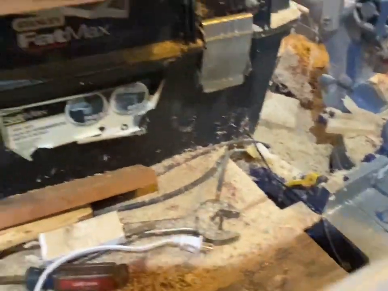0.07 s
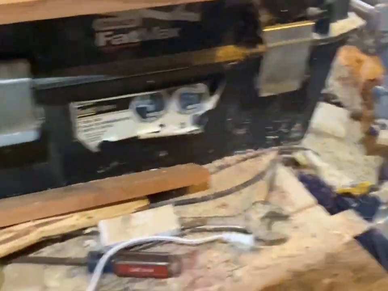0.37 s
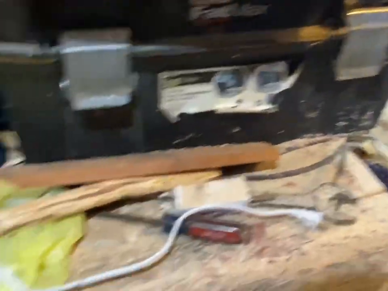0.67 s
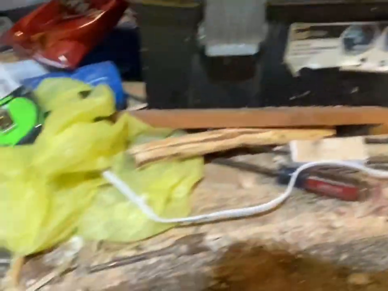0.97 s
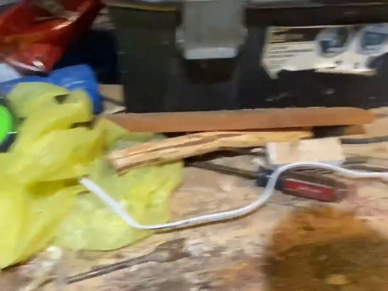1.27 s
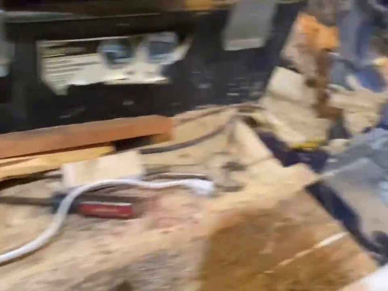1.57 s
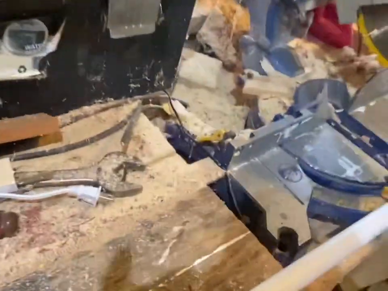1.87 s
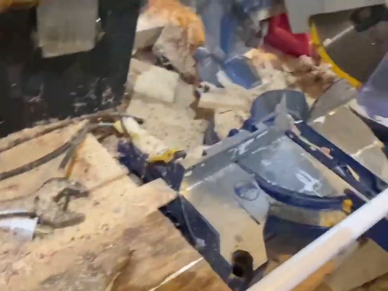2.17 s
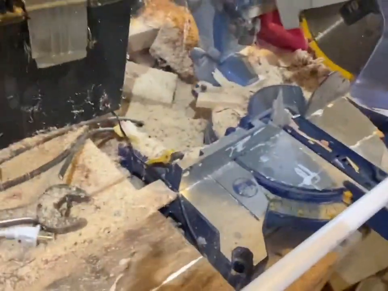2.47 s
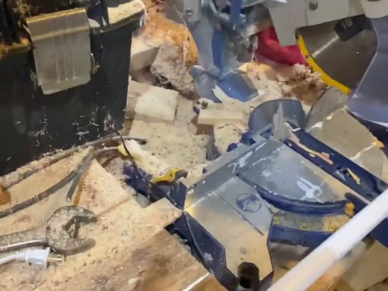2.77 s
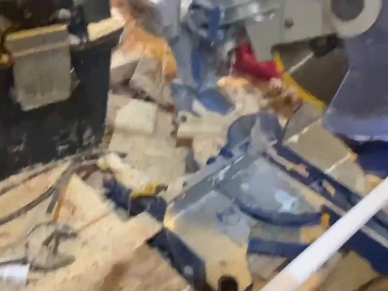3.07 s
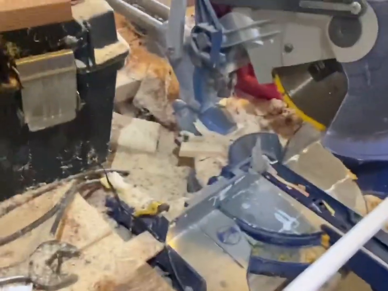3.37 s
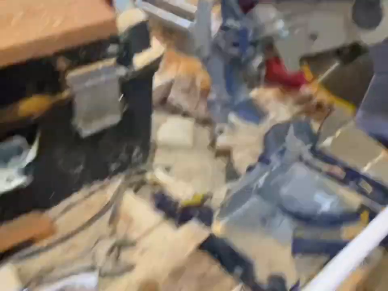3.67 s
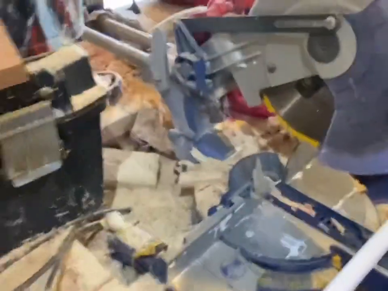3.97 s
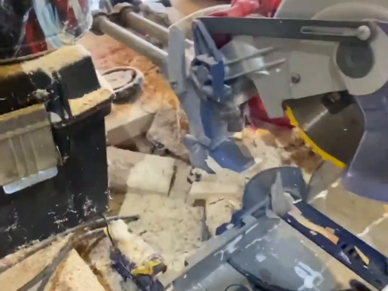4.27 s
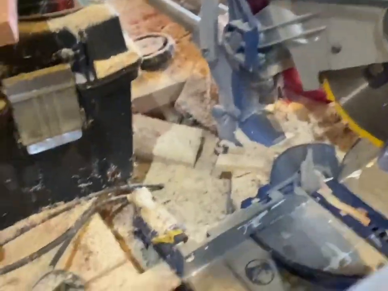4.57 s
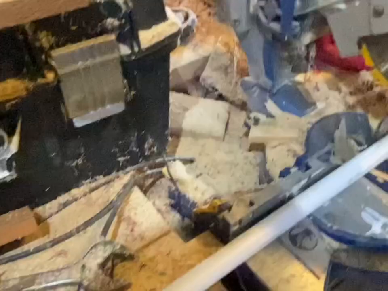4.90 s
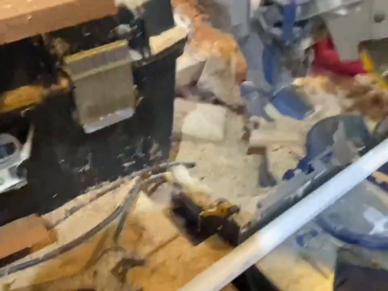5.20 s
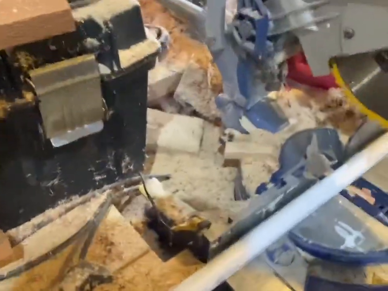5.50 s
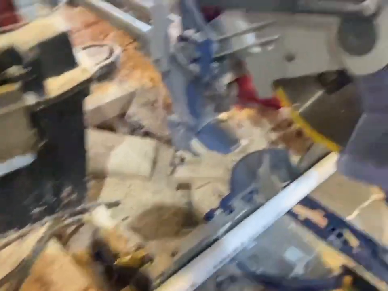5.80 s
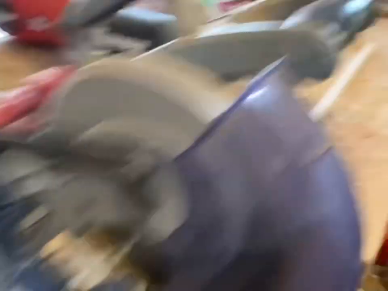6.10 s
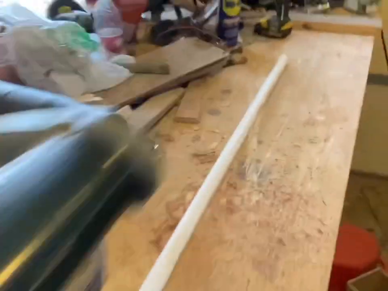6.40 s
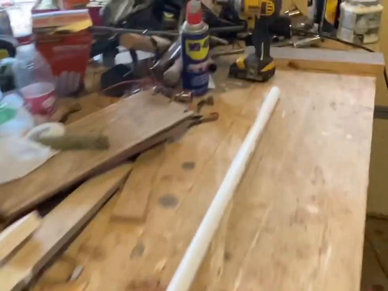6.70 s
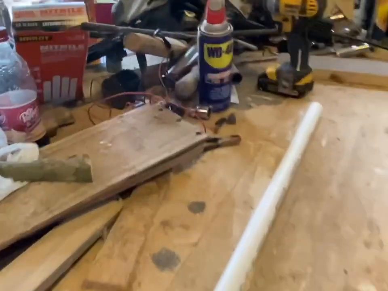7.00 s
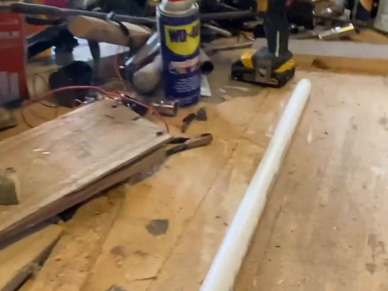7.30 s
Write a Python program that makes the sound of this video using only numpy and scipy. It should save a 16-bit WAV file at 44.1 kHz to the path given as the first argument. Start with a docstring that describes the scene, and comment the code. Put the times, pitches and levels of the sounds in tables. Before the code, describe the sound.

A small, hard-walled workshop is quiet, with a faint low rumble. At about 0.3 seconds one plastic pipe clicks against another. At 1.4 seconds a stack of pipes topples slightly to the left with a loud, bright, hollow clatter. A second, longer rush follows from about 1.8 seconds, peaking just after 2 with a low boom and a short room echo. The rebounds die away with a brief scrape by 3 seconds. A faint sleeve swish and a light tap follow. From about 4.3 seconds one pipe is handled close to the microphone. It knocks sharply on a saw table at 4.8 seconds, well below the crash in level, and bumps again around 5. It is then nudged along with faint scraping, rustling sleeves and shuffling shoes. Softer knocks come near 5.7, 6.3 and 7.1 seconds, and the sliding continues until about 7.5.

```python
"""A stack of plastic pipes topples in two rushes, off to the left in a small, hard-walled workshop.
Each impact excites the pipes' damped normal modes; the rebounds die away under a hollow boom.
Beforehand one pipe clicks against another; afterwards one is knocked onto a saw table close by and
nudged along by stick-slip friction. Sleeves rustle and shoes shuffle as friction noise, over quiet air
and a low rumble, and the walls return the impacts as a diffuse reverberant field."""
import sys
import numpy as np
from scipy import signal
from scipy.fft import rfft, irfft
from scipy.io import wavfile
from scipy.ndimage import uniform_filter1d

SR = 44100
rng = np.random.default_rng(int(sys.argv[2]) if len(sys.argv) > 2 else 0)


def digitize_waveform(pressure):
    """Quantize a signal to 16-bit integers and store it at the path in sys.argv[1].

    Rows of a 2-D input are taken as channels; values are limited to [-1, 1].
    """
    field = np.atleast_2d(pressure).T
    bounded = np.clip(field, -1, 1)
    quanta = np.round(bounded * 32767).astype(np.int16)
    wavfile.write(sys.argv[1], SR, quanta)


N = 328545
TIME = np.arange(N) / SR
CUTOFF_HZ = 15900

# Levels in all tables are relative; pan is left over right, brightness is treble over middle.
# left-right coherence of the diffuse field: f/Hz, coherence (0-1)
COHERENCE = [(60, 0.94), (170, 0.83), (350, 0.61), (700, 0.088), (1300, 0.065), (3000, 0.002),
             (15000, 0.12)]
# friction while the pipe is moved, one list for each move: t/s, sliding level/dB, rustle level/dB
MOVES = [
    [(4.27, -66.5, -71), (4.346, -55.5, -65), (4.438, -63, -63.5), (4.82, -50, -61.5), (4.988, -50, -51),
     (5.19, -54.5, -57.5), (5.46, -60.5, -64.5)],
    [(5.52, -62, -63), (5.624, -53.5, -57), (5.738, -55.5, -46.5), (5.826, -53, -50.5),
     (5.982, -57.5, -53.5), (6.11, -56.5, -70)],
    [(6.17, -61, -62.5), (6.234, -46.5, -55), (6.388, -56, -49.5), (6.526, -49.5, -52.5),
     (6.68, -55.5, -54), (6.798, -62.5, -67), (6.94, -64, -67.5)],
    [(7.01, -62, -69.5), (7.114, -54.5, -58), (7.242, -57.5, -52), (7.372, -50.5, -47.5), (7.45, -50, -49)],
]


def from_db(db):
    """Amplitude ratio of a level: a factor of ten for every 20 dB."""
    return 10 ** (np.asarray(db) / 20)


def rms_one(x):
    """Normalisation to unit mean power."""
    return x / np.sqrt(np.mean(x ** 2) + 1e-20)


def energy_one(x):
    """Normalisation to unit energy per channel."""
    return rms_one(x) / np.sqrt(x.shape[-1])


def running_rms(x, size):
    """Envelope as the rms over a sliding window of samples."""
    return np.sqrt(np.abs(uniform_filter1d(x ** 2, size)) + 1e-16)


def at_hz(points, hz):
    """Interpolation on a logarithmic frequency axis."""
    f, value = np.transpose(points)
    return np.interp(np.log(hz), np.log(f), value)


def gains(rows):
    """Envelopes interpolated in decibels, one for each level column, silent outside their span."""
    times, *columns = np.transpose(rows)
    return from_db([np.interp(TIME, times, db, left=-200, right=-200) for db in columns])


def add(track, s, sound):
    """Superposition of a sound on a track, starting at time s."""
    start = max(round(s * SR), 0)
    track[..., start:start + sound.shape[-1]] += sound[..., :N - start]


def decay(t, t60):
    """Exponential damping: 60 dB down after t60."""
    return from_db(-60 * t / t60)


def swell(s, attack_s, hold_s, release_s, power):
    """Power-law envelope: a linear rise, a hold, then a fall as a power of the time left."""
    rise = np.clip((TIME - s) / attack_s, 0, 1)
    left = np.clip(1 - (TIME - s - attack_s - hold_s) / release_s, 0, 1)
    return rise * left ** power


def wander(per_s):
    """Slow random modulation with a spread of about 1."""
    knots = rng.standard_normal(400)
    return 1.2 * np.interp(TIME * per_s, np.arange(len(knots)), knots)


def filtered(x, hz, kind, order=2):
    """Frequency selection with a maximally flat passband."""
    return signal.sosfilt(signal.butter(order, hz, kind, fs=SR, output="sos"), x)


def resonator(x, hz, q):
    """Forced response of one resonance of quality factor q."""
    return signal.lfilter(*signal.iirpeak(hz, q, fs=SR), x)


def registers(x, bass_hz=350, treble_hz=3500):
    """Crossover into middle, bass and treble, in that order."""
    cuts = [([bass_hz, treble_hz], "band"), (bass_hz, "low"), (treble_hz, "high")]
    return [filtered(x, hz, kind, order=3) for hz, kind in cuts]


def coloured(x, spectrum):
    """Minimum-phase filtering: folding the cepstrum of a spectrum makes its response causal."""
    size = len(x)
    hz = np.arange(size // 2 + 1) * SR / size + 1
    cepstrum = irfft(np.log(from_db(at_hz(spectrum, hz))))
    cepstrum[1:size // 2] *= 2
    cepstrum[size // 2 + 1:] = 0
    return irfft(rfft(x) * np.exp(rfft(cepstrum)))


def placed(x, pan_db, lag_ms=0):
    """Level and time differences: a source on the left is louder and earlier on that side."""
    t = TIME[:len(x)]
    delayed = np.interp(t - lag_ms / 1000, t, x)
    return np.array([x * from_db(pan_db / 2), delayed * from_db(-pan_db / 2)])


def diffuse(mid, side, hz):
    """Spatial coherence: long waves reach both sides alike, short ones independently."""
    alike = at_hz(COHERENCE, hz)
    return np.sqrt(1 + alike) * mid + np.sqrt(1 - alike) * side * [[1], [-1]]


def noise(spectrum, size=N, t60s=None):
    """Diffuse noise field in bands; given decay times, each band is damped at its own rate."""
    edges_hz = np.geomspace(35, 17000, 23)
    out, white = 0, rng.standard_normal((2, 2, size))
    for k, (low, high) in enumerate(zip(edges_hz, edges_hz[1:])):
        hz = np.sqrt(low * high)
        fade = 1 if t60s is None else decay(TIME[:size], at_hz(t60s, hz)) + 1e-12
        mid, side = filtered(white[k % 2] * fade, [low, high], "band")
        out = out + from_db(at_hz(spectrum, hz)) * diffuse(mid, side, hz)
    return rms_one(out)


def contacts(per_s, spread_db):
    """Shot noise: independent small impacts of uneven size."""
    sizes = from_db(spread_db * np.minimum(rng.exponential(1, N), 3)) * rng.choice([-1, 1], N)
    return rms_one(sizes * (rng.random(N) < per_s / SR))


def uneven(slips, steady, size):
    """Amplitude modulation of friction: a steady part plus a flutter that follows the slips."""
    return rms_one(steady + rms_one(running_rms(slips, size)))


def body(spectrum, modes, dense_t60, ring_db, snap_db, size=8192):
    """Impulse response by modal superposition: a snap, a crack of crowded modes and clear ringing."""
    t = TIME[:size]
    hz, level_db, t60 = np.transpose(modes)[:, :, None]
    strength = from_db(level_db + rng.normal(0, 1.5, hz.shape)) * rng.choice([-1, 1], hz.shape)
    rings = np.sum(strength * np.sin(2 * np.pi * hz * t) * decay(t, t60), axis=0)
    crack = energy_one(rng.standard_normal(size) * decay(t, dense_t60))
    crack[0] += from_db(snap_db)
    return energy_one(coloured(crack, spectrum)) + from_db(ring_db) * energy_one(rings)


def blow(response, levels_db, soft_hz):
    """Contact hardness sets bandwidth: a blow with little treble is duller in the middle too."""
    middle, bass, treble = registers(response)
    brightness_db = levels_db[2] - levels_db[0]
    top_hz = np.clip(soft_hz * from_db(brightness_db + 26), soft_hz, SR / 4)
    middle = filtered(middle, top_hz, "low", order=3)
    return sum(from_db(db) * part / running_rms(part, size=256).max()
               for db, part in zip(levels_db, (middle, bass, treble)))


def workshop(x, build_s):
    """Reverberation: diffuse reflections build up within milliseconds and decay exponentially."""
    # reverberation time: f/Hz, t60/s
    decay_times = [(100, 0.4), (400, 0.4), (2000, 0.5), (6000, 0.52), (15000, 0.35)]
    # spectrum of the reflections: f/Hz, level/dB
    colour = [(60, 0.5), (200, 5), (600, 1), (2000, 0.5), (6000, 2), (15000, 6.5)]
    tail = noise(colour, size=32768, t60s=decay_times)
    build_up = 1 - np.exp(-TIME[:tail.shape[1]] / build_s)
    return signal.fftconvolve(x[None], energy_one(tail * build_up), axes=1)[:, :N]


def air():
    """Stationary broadband noise: the still air of the room."""
    # spectral density: f/Hz, level/dB
    spectrum = [(21, -37), (35, -15), (129, -18.5), (258, -15.5), (351, -13.5), (478, -20.5), (720, -17),
                (1020, -18.5), (1370, -11), (1700, -12.5), (4000, -15), (5590, -17), (7810, -27.5),
                (16000, -43.5)]
    return from_db(-68.5) * noise(spectrum)


def rumble():
    """Amplitude-modulated low noise: a rumble that swells and sinks."""
    # envelope: t/s, level/dB
    envelope = [(0, -57), (.6, -59.5), (1.3, -59.5), (2.9, -54), (3.3, -58.5), (3.61, -52), (3.65, -67.5),
                (4.25, -70), (4.6, -68.5), (7.45, -58)]
    # spectral density: f/Hz, level/dB
    spectrum = [(21, -30), (35, -12), (55, -6.5), (95, -10.5), (155, -15.5), (227, -20), (309, -25.5),
                (420, -15.5), (587, -27.5)]
    return gains(envelope)[0] * filtered(noise(spectrum), 900, "low")


def sleeve_swishes(width_s=0.086):
    """Sliding friction of cloth on cloth: a smooth hiss swells and fades in one broad resonance."""
    # swishes: crest t/s, level/dB, centre f/Hz
    swishes = [(1.09, -62, 4620), (3.095, -54, 5560)]
    out = 0
    for s, db, hz in swishes:
        hiss = resonator(rng.standard_normal((2, N)), hz, q=2.7)
        out = out + from_db(db) * rms_one(hiss) * np.exp(-((TIME - s) / width_s) ** 2)
    return out


def brushes(attack_s=0.035, release_s=0.1):
    """Friction of fingers and cloth close by: a thin, high hiss, grainy with catching fibres."""
    # strokes: t/s, duration/s, level/dB
    strokes = [(1.028, 0.15, -63.5), (3.005, 0.26, -74), (4.264, 0.38, -65.5), (4.56, 0.32, -57),
               (4.838, 0.38, -57.5), (5.3, 0.2, -61), (5.38, 0.13, -62), (5.515, 0.11, -53),
               (5.604, 0.42, -51.5), (6.007, 0.14, -56), (6.155, 0.56, -56), (7.185, .4, -58)]
    # spectral density of the hiss: f/Hz, level/dB
    spectrum = [(35, -60), (6000, -17), (8500, 3.5), (10300, 12), (12000, 6.5), (14500, 12.5), (16000, -4)]
    pressure = sum(from_db(db) * swell(s, attack_s, length - attack_s - release_s, release_s, power=1)
                   for s, length, db in strokes)
    grain = uneven(contacts(per_s=250, spread_db=-10), steady=2.6, size=128)
    return pressure * grain * noise(spectrum)


def grit(catches_per_s=42, count=3):
    """Shot noise of sliding: the pipe catches on specks of sawdust, each with a tiny dry crack."""
    # spectral density of a catch: f/Hz, level/dB
    spectrum = [(200, -28), (1000, -2), (2200, -3), (5000, 0), (15000, -27)]
    t, crackle = TIME[:2048], 0
    for _ in range(count):
        crack = coloured(rng.standard_normal(len(t)) * decay(t, t60=0.026), spectrum)
        catches = contacts(catches_per_s / count, spread_db=6.5)
        crackle = crackle + signal.oaconvolve(catches, crack)[:N]
    sliding, rustle = gains(np.vstack(MOVES))
    direct = from_db(-10) * np.sqrt(sliding * rustle) * rms_one(crackle)
    return direct + from_db(3.5) * workshop(direct, build_s=0.00093)


def grip_glide(x, depth=0.007):
    """Frequency modulation: as the grip shifts, the pitch of a resonance wanders."""
    position = np.cumsum(1 + depth * wander(per_s=5)) % (N - 1)
    whole, part = position.astype(int), position % 1
    return np.take(x, whole, axis=-1) * (1 - part) + np.take(x, whole + 1, axis=-1) * part


def hollows():
    """Friction-driven resonances swell and fade as grip and contact shift, the low ones most."""
    # rubbed resonances: f/Hz, bandwidth/Hz, level/dB
    resonances = [(170, 45, -5), (354, 60, -10), (534, 24, -14.5), (766, 170, -9.5), (1364, 42, -18),
                  (2014, 75, -14.5), (2440, 50, -21), (2804, 60, -15), (3416, 46, -15), (4280, 90, -15),
                  (5000, 140, -17), (5480, 130, -13), (6340, 140, -18)]
    # depth of their fluctuation: f/Hz, spread/dB
    swing = [(500, 5.2), (2000, 3.6), (5000, 2.6)]
    out = 0
    for hz, width_hz, db in resonances:
        mid, side = resonator(rng.standard_normal((2, N)), hz, q=hz / width_hz)
        swing_db = at_hz(swing, hz) * wander(per_s=12)
        out = out + from_db(db) * rms_one(diffuse(mid, side, hz) * from_db(swing_db))
    return rms_one(grip_glide(out))


def held_pipe_response(ring_db, snap_db):
    """Frequency-dependent damping: the plastic of the held pipe stills its high modes sooner."""
    # modes of the pipe on the table: f/Hz, level/dB
    partials = [(205, -19), (345, -9), (470, -3), (572, 2), (684, 6), (860, 6.5), (1014, 7.5), (1087, 6.5),
                (1200, 3.5), (1370, 5.5), (1720, 5.5), (2040, 3.5), (2370, 8.5), (5001, 1), (6130, -22),
                (7262, 1)]
    # spectral density of its crack: f/Hz, level/dB
    spectrum = [(40, -44.5), (100, -9), (200, -6), (300, -2), (650, 0.5), (1000, 1.5), (1500, -6.5),
                (2400, -7), (3300, -15.5), (6000, -11), (8000, -39), (10500, -19.5), (12500, -56),
                (15000, -36.5)]
    modes = [(hz, db, 0.1 * (1000 / hz) ** 0.75) for hz, db in partials]
    return body(spectrum, modes, dense_t60=0.035, ring_db=ring_db, snap_db=snap_db)


def handling():
    """Friction of pipe, shoes and sleeves: tiny slips roughen the rubbing and set the pipe ringing."""
    # spectral density of the rubbing: f/Hz, level/dB
    spectrum = [(35, -45), (70, 13), (160, 2), (250, 12.5), (350, -4), (500, -33), (700, -9.5), (1500, -4),
                (2600, -6), (5400, -6.5), (8500, -16.5), (10300, -46), (16000, -18)]
    slips = contacts(per_s=380, spread_db=3)
    rub = (noise(spectrum) + hollows()) * uneven(slips, steady=4.9, size=330)
    sliding, rustle = gains(np.vstack(MOVES))
    # the pipe slides in the middle register, shoes shuffle in the bass, sleeves rustle in the treble
    drive = from_db(1.5) * sliding, from_db(-2) * sliding, from_db(-0.5) * rustle
    friction = sum(gain * rms_one(part) for gain, part in zip(drive, registers(rub)))
    ringing = signal.oaconvolve(slips, held_pipe_response(ring_db=2.5, snap_db=27))[:N]
    return friction + from_db(-9) * sliding * rms_one(grip_glide(ringing))


def scrapes(slips_per_s=1500):
    """Stick-slip friction: dense tiny contacts in a broad resonance, starting fast and easing off."""
    # drags of a pipe over wood or another pipe: t/s, duration/s, level/dB, centre f/Hz
    drags = [(0.005, 0.23, -67, 2190), (1.099, 0.072, -70, 1340), (2.431, 0.18, -51.5, 4670),
             (2.519, 0.12, -39.5, 1390), (2.689, 0.12, -50, 1200), (2.694, 0.1, -64, 5052),
             (2.912, 0.16, -61, 780), (4.568, 0.066, -51.5, 1940), (4.712, 0.028, -60.5, 4250),
             (5.386, 0.048, -56.5, 2580), (5.529, 0.032, -55.5, 2520), (5.566, 0.015, -56, 1690),
             (5.605, 0.025, -58, 2040), (5.682, 0.021, -49.5, 1830), (5.714, 0.019, -60, 2390),
             (5.843, 0.2, -62.5, 2380), (6.075, 0.035, -63.5, 1590), (6.296, 0.093, -55.5, 710),
             (6.713, 0.031, -56, 568), (6.78, 0.11, -62.5, 1570), (7.062, 0.044, -50.5, 660),
             (7.239, 0.17, -55, 553)]
    out = np.zeros(N)
    for s, length, db, hz in drags:
        progress = np.linspace(0, 1, round(length * SR))[:8192]
        slips = rng.standard_normal(8192) * (rng.random(8192) < slips_per_s / SR)
        drag = filtered(slips[:len(progress)], [hz / 1.45, hz * 1.45], "band")
        pressure = np.sin(np.pi * progress ** 0.51)
        add(out, s, from_db(db) * rms_one(drag * pressure))
    return out + from_db(5) * workshop(out, build_s=0.00056)


def thuds(attack_s=0.0028):
    """Soft, heavy contacts excite the low modes of floor and bench; one, set by the spot, rings on."""
    # footfalls and bumps: t/s, level/dB, ring f/Hz, ring level/dB
    bumps = [(0.01, -46.5, 163, -53), (4.282, -59, 143, -49.5), (4.584, -44.5, 169.6, -42),
             (4.614, -48, 309, -44.5), (4.827, -40, 205.6, -32), (4.916, -41, 308, -47),
             (5.036, -33, 382.4, -43.5), (5.102, -38.5, 153, -49), (5.631, -67, 168, -50),
             (5.746, -45, 315, -47), (5.898, -46.5, 299, -47.5), (6.413, -46.5, 337.5, -47),
             (6.723, -52.5, 516, -55.5), (7.094, -47.5, 257, -48), (7.334, -62, 199, -47)]
    # spectral density of a bump: f/Hz, level/dB
    spectrum = [(50, 1), (100, 8), (160, 13.5), (330, 2), (600, 0.5), (2000, -23.5)]
    out, t = np.zeros((2, N)), TIME[:12000]
    for s, db, hz, ring_db in bumps:
        thud = noise(spectrum, size=len(t), t60s=[(100, 0.3), (600, 0.43)])
        ring = np.sin(2 * np.pi * hz * t) * (1 - np.exp(-t / attack_s)) * decay(t, t60=0.24)
        add(out, s, from_db(db) * thud / running_rms(thud[0], size=512).max())
        add(out, s, from_db(ring_db) * ring / running_rms(ring, size=512).max())
    return out


def knocks():
    """Impact excitation: the held pipe meets saw table and bench, so close that direct sound leads."""
    # knocks: t/s, level/dB, bass level/dB, brightness/dB, pan/dB
    strikes = [(0.007, -50, -49, -24, -10), (3.544, -50, -57, -14, 3), (3.778, -60.5, -60.5, -9, 0),
               (4.357, -58, -55, -2, 2), (4.569, -44, -61, -18, -8), (4.62, -51, -63, 3, 6),
               (4.76, -50, -58, -18, -4), (4.803, -19, -40, -9, -11.5), (4.81, -23, -28, -22, 2),
               (4.915, -36, -52, -30, 6), (4.948, -47, -50, -29, 0), (5.005, -33, -33, -20, -6),
               (5.027, -38, -48, -7, 26), (5.032, -32, -44, -8, -13), (5.051, -40, -44, -4, 15),
               (5.607, -50.5, -66, -24, -5), (5.747, -32, -35.5, -21, -5), (5.818, -50, -58, 4.5, 0),
               (5.921, -52, -56, -14, -5), (6.185, -53.5, -57, 0.5, 15), (6.238, -33.5, -36.5, -23, -3),
               (6.292, -38.5, -58, -29, -4), (6.331, -38.5, -38.5, -28, -2), (7.066, -41, -47.5, -22, 7),
               (7.178, -56, -48, -7, -1)]
    out = np.zeros((2, N))
    for s, db, bass_db, bright_db, pan_db in strikes:
        response = held_pipe_response(ring_db=0.5, snap_db=-6)
        knock = blow(response, (db, bass_db, db + bright_db), soft_hz=970)
        add(out, s, placed(knock, pan_db))
    return out + from_db(-6.5) * workshop(out.mean(axis=0), build_s=0.00061)


def clicks():
    """Free vibration after a light touch of pipe on pipe: a bright, quickly damped ring to the left."""
    # touches: t/s, middle level/dB, bass level/dB, treble level/dB, pan/dB
    touches = [(0.242, -59, -75, -68, -1), (0.299, -27, -38, -33, 5.5), (0.3024, -36.5, -45, -51, 0)]
    # modes of a click: f/Hz, level/dB, t60/s
    modes = [(244.7, -19.5, 0.28), (1290, -12, .04), (1970, 6, 0.015), (2250, -2, 0.009), (2660, -8, 0.021),
             (3580, -1.5, 0.017), (4670, -9, 0.013), (6130, -11, 0.016), (9900, -14.5, 0.016)]
    # spectral density of its crack: f/Hz, level/dB
    spectrum = [(50, -10), (110, 5), (250, 0.5), (500, -7), (1000, -2.5), (2000, -6.5), (2900, -10.5),
                (4500, -19), (9500, -28), (12000, -40), (15000, -34)]
    direct, radiated = np.zeros((2, N)), np.zeros(N)
    for s, *levels_db, pan_db in touches:
        response = body(spectrum, modes, dense_t60=0.17, ring_db=4.5, snap_db=-6)
        add(direct, s, placed(blow(response, levels_db, soft_hz=3000), pan_db, lag_ms=0.432))
        into_room = body(spectrum, modes, dense_t60=0.04, ring_db=-14, snap_db=7)
        add(radiated, s, from_db(levels_db[0]) * into_room)
    return from_db(5) * direct + from_db(24) * workshop(radiated, build_s=0.0015)


def rim_ticks():
    """Brief contact means high frequencies: the hard, cut rim of a pipe strikes with a bright tick."""
    # rim strikes: t/s, level/dB, centre f/Hz, pan/dB
    strikes = [(1.4037, -22.5, 9380, -4.5), (1.4374, -7, 9920, -5.5), (1.4796, -10.5, 7400, 4.5),
               (1.7556, -37, 7580, 1.5), (1.845, -26.5, 7490, 5.5), (1.8582, -21.5, 8270, 5.5),
               (1.901, -25.5, 7710, -1.5), (1.92, -20.5, 7900, 4.5), (2.0174, -11, 7620, 0),
               (2.0802, -7.5, 9490, 5.5), (2.0855, -5.5, 10200, -4), (2.2413, -11, 14040, 4),
               (2.2494, -8, 9800, 0.5), (4.8064, -24, 7750, 12), (6.1856, -34, 9740, 6)]
    out, t = np.zeros((2, N)), TIME[:2048]
    for s, db, hz, pan_db in strikes:
        burst = rng.standard_normal(len(t)) * decay(t, t60=0.0074)
        tick = filtered(burst, [hz / 1.35, min(hz * 1.5, CUTOFF_HZ)], "band")
        add(out, s, placed(from_db(db - 3.5) * tick / np.abs(tick).max(), pan_db))
    return out + from_db(-7) * workshop(out.mean(axis=0), build_s=0.003)


def boom(hz=147, width_hz=8):
    """Forced resonance: as the bulk of the stack lands, it keeps one low, hollow mode going."""
    ring = resonator(rng.standard_normal(N), hz, q=hz / width_hz)
    drive = from_db(-28) * swell(2.108, attack_s=0.054, hold_s=0.14, release_s=0.36, power=2.3)
    return placed(drive * ring / running_rms(ring, size=2048), pan_db=-3.5)


def ringing_pipes(count=3, pitch_spread=0.006):
    """Beating: a struck pipe rings with a cluster of close modes."""
    # pipes that ring out above the rest: t/s, f/Hz, level/dB, t60/s
    rings = [(1.403, 205, -32, 0.12), (1.4405, 1890, -16, 0.016), (1.4405, 2260, -14.5, 0.025),
             (1.44, 2570, -18.5, .05), (1.46, 261, -34.5, 0.32), (1.47, 2605, -28.5, 0.16),
             (1.474, 408, -31, 0.4), (1.49, 549, -29.5, 0.16), (1.442, 1700, -28.5, .25),
             (1.853, 960, -30, 0.16), (1.903, 236, -27, 0.05), (1.911, 350, -31, 0.27),
             (1.921, 3410, -21.5, 0.015), (1.93, 1254, -32, 0.46), (2.022, 2089, -23, 0.44),
             (2.051, 2332, -23.5, 0.19), (2.08, 2734, -29, 0.4), (2.088, 3096, -30.5, 0.3),
             (2.08, 4600, -35, .5), (2.088, 7118, -33, .4), (2.088, 9991, -31, .45),
             (2.152, 1385, -19.5, 0.21), (2.162, 1710, -32, 0.19), (2.185, 1220, -24, 0.19),
             (2.29, 350, -32, 0.29), (2.31, 624.4, -34, 0.33)]
    out, t = np.zeros(N), TIME[:16384]
    for s, hz, db, t60 in rings:
        detune, phase = rng.standard_normal((2, count, 1))
        cluster = np.sin(2 * np.pi * (hz * (1 + pitch_spread * detune) * t + phase)).sum(axis=0)
        ring = cluster * decay(t, t60) * (1 - np.exp(-t * hz / 2))
        add(out, s, from_db(db) * ring / running_rms(ring, size=512).max())
    return out


def stack_pipe_response(pitch_spread=0.07):
    """Mode frequencies scale with length, so each pipe in the stack has a pitch of its own."""
    # modes of a typical pipe: f/Hz, level/dB, t60/s
    modes = [(342, -4.5, 0.047), (413, -5.5, 0.12), (554.7, 1, 0.073), (1294, -5.5, 0.062),
             (1530, 1.5, 0.063), (1980, -1.5, 0.025), (2427, 8.5, 0.056)]
    # spectral density of its crack: f/Hz, level/dB
    spectrum = [(29, -51.5), (50, -14), (103, -10), (148, -2.5), (240, -6), (559, -8), (661, -6.5),
                (1180, -4), (1270, -3), (2620, -8.5), (8540, -20.5), (9870, -20), (12000, -38),
                (14900, -25), (16000, -48)]
    pitch = np.exp(pitch_spread * rng.standard_normal())
    tuned = [(hz * pitch, db, t60) for hz, db, t60 in modes]
    return body(spectrum, tuned, dense_t60=0.013, ring_db=-10, snap_db=-3)


def rebound_vigour(power, attack_s=0.014):
    """Inelastic collisions: once the stack gives way, rebounds shrink as a power of the time left."""
    # two rushes and a faint slip between them: t/s, tumbling/s, settling/s, level/dB
    rushes = [(1.404, 0.037, 0.33, -25.5), (1.759, 0.022, 0.19, -55), (1.89, .29, .75, -28)]
    return sum(from_db(db) * swell(s, attack_s, tumbling_s, settling_s, power)
               for s, tumbling_s, settling_s, db in rushes)


def rebounds(drive, pipes=2):
    """Random impact trains excite pipes bouncing on each other; drive has a gain for each register."""
    bounces = 0
    for _ in range(pipes):
        impacts = contacts(per_s=110, spread_db=-1.5)
        bounces = bounces + signal.oaconvolve(impacts, stack_pipe_response())[:N]
    return sum(gain * part / running_rms(part, size=2048)
               for gain, part in zip(drive, registers(bounces)))


def falling_stack(spots=4):
    """Strikes and rebounds heard mostly as reverberation; each landing spot has its own room response."""
    # hard strikes: t/s, level/dB, brightness/dB
    crashes = [(1.403, -12, -9), (1.416, -19.5, -2.5), (1.439, -11, -4), (1.466, -15.5, -12.5),
               (1.481, -18, -6), (1.757, -33.5, -1), (1.782, -36.5, -6.5), (1.846, -26.5, -2.5),
               (1.86, -16.5, -6), (1.901, -15.5, -12), (1.92, -12.5, -5.5), (1.948, -16, -7),
               (2.016, -16, 0.5), (2.04, -14, -14.5), (2.079, -9, 1.5), (2.088, -16, 2), (2.101, -17.5, -7),
               (2.153, -9.5, -30.5), (2.186, -13, -8), (2.246, -17, -5.5), (2.406, -20.5, -36),
               (2.461, -23, -38)]
    # middle, bass, treble: weaker rebounds are duller, so the treble dies first and the bass last
    drive = (rebound_vigour(power=2.2),
             from_db(-11.5) * rebound_vigour(power=1.4),
             from_db(-7.5) * rebound_vigour(power=4.7))
    direct = ringing_pipes()
    room = workshop(from_db(-10) * direct, build_s=0.00067)
    for spot in range(spots):
        rattle = rebounds(drive) / np.sqrt(spots)
        strikes = np.zeros(N)
        for s, db, bright_db in crashes[spot::spots]:
            levels_db = db, db - 17.5, db + bright_db
            add(strikes, s, blow(stack_pipe_response(), levels_db, soft_hz=2080))
        direct = direct + from_db(-5.5) * strikes + from_db(-7.5) * rattle
        room = room + workshop(strikes + rattle, build_s=0.00025)
    return placed(direct, pan_db=4, lag_ms=0.32) + from_db(3) * room


def scene():
    """Linear superposition of background, impacts and friction."""
    background = air() + rumble()
    impacts = falling_stack() + boom() + clicks() + rim_ticks() + knocks() + thuds()
    friction = scrapes() + handling() + grit() + brushes() + sleeve_swishes()
    return background + impacts + friction


def record(dry):
    """Band limiting and soft saturation: a notch in the high treble, rounded peaks, a steep top cut."""
    notched = filtered(dry, [11400, 12900], "bandstop")
    top_cut = signal.ellip(12, 0.1, 100, CUTOFF_HZ, fs=SR, output="sos")
    return signal.sosfilt(top_cut, np.tanh(notched))


dry = scene()
out = record(dry)
digitize_waveform(out)
```